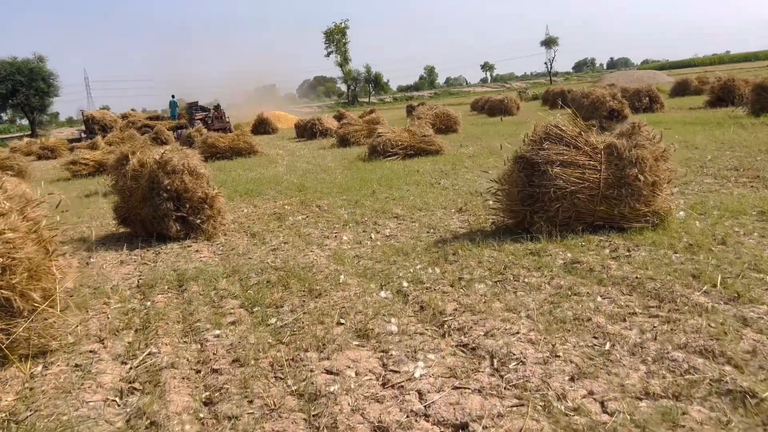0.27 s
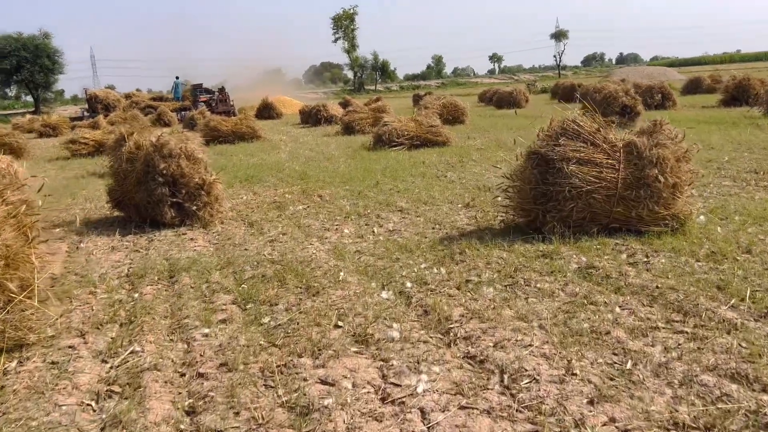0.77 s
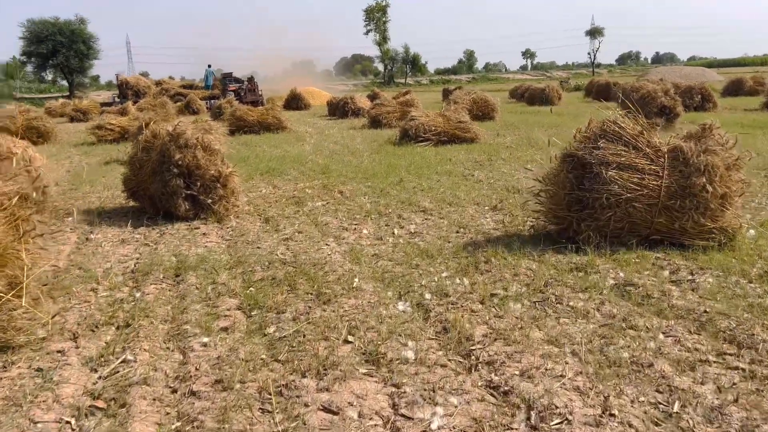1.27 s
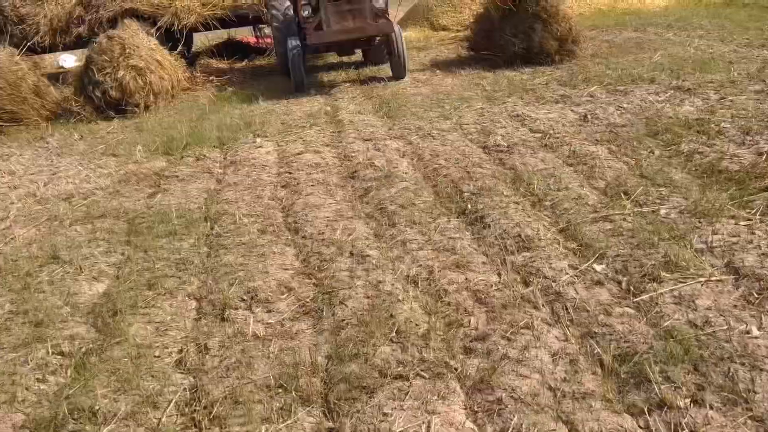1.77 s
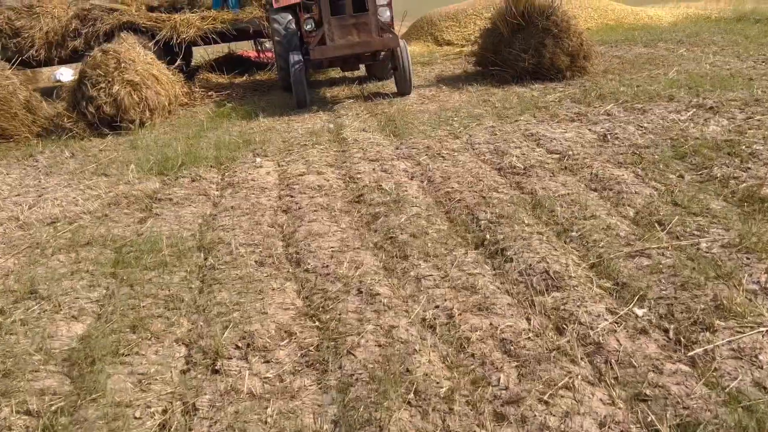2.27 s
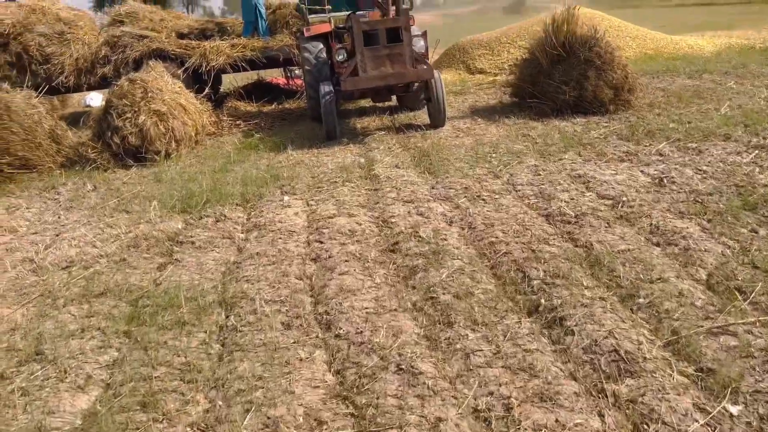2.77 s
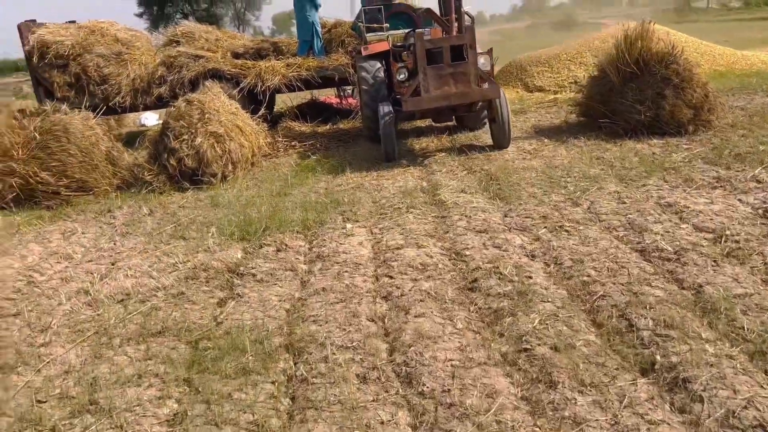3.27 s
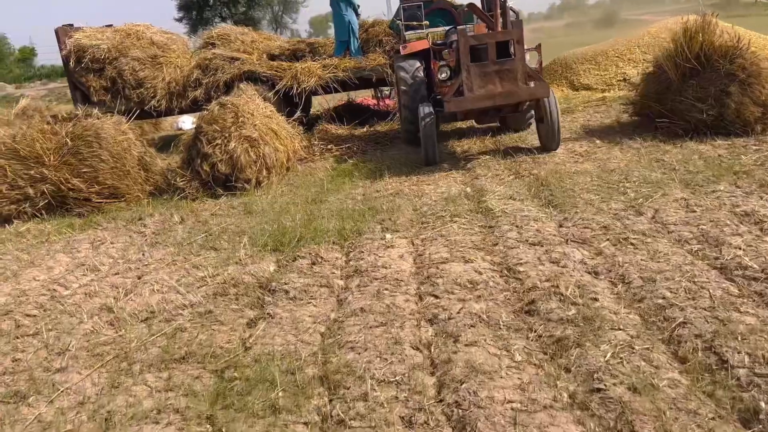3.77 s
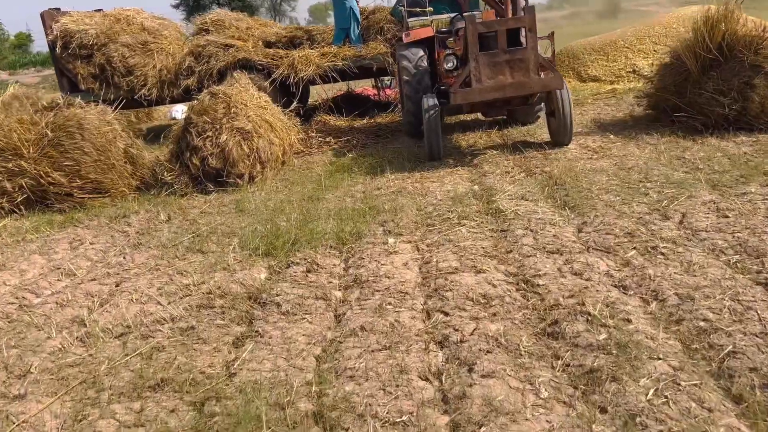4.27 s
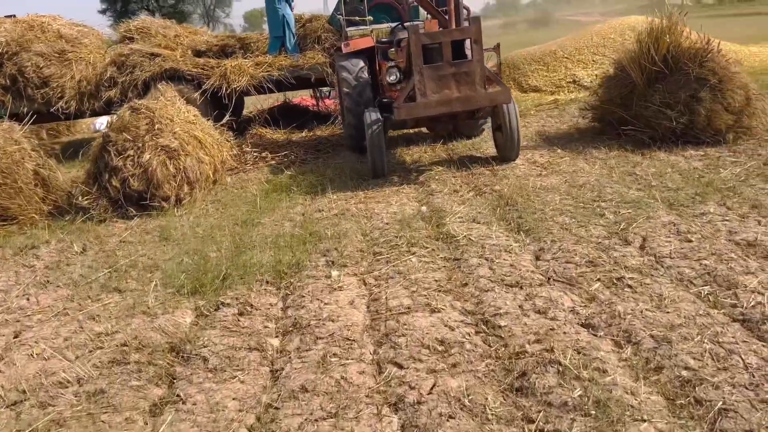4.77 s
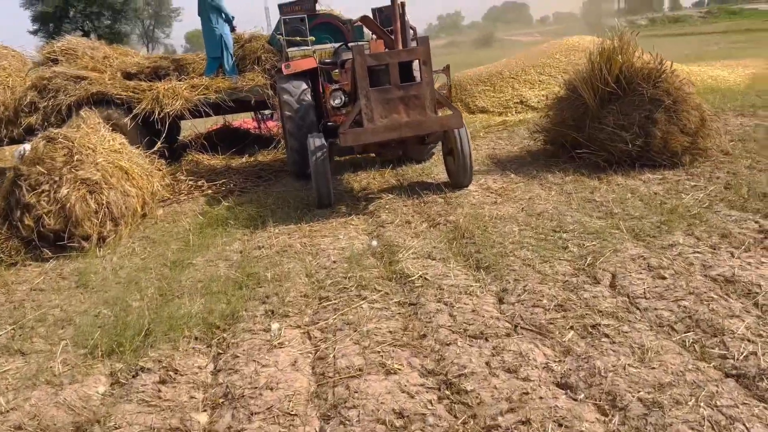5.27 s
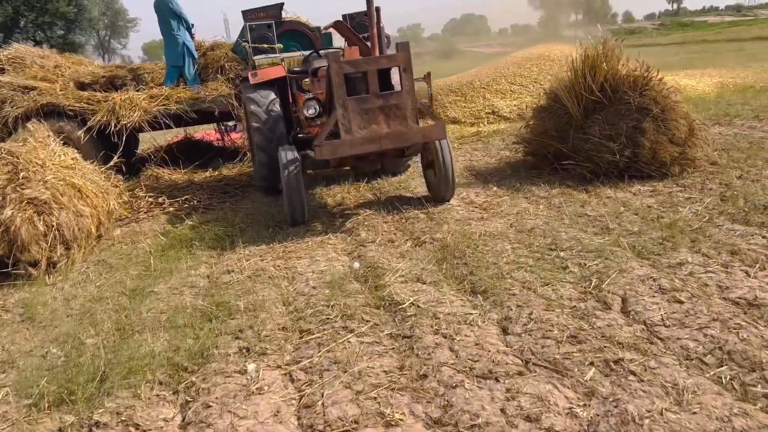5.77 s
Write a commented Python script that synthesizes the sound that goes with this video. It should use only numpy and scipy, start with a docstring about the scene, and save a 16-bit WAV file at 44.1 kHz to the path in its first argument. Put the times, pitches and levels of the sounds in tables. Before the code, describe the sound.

A diesel tractor drives a grain thresher in an open field, heard first from far off as a faint, steady low drone with light clatter and a thin hiss. In the first quarter second a footstep crackles on dry stubble and clods close to the microphone, followed by a few small straw snaps. At about 1.7 seconds the sound dips to silence for an instant, then returns much louder and closer: a strong low hum, pulsing exhaust, rapid metallic knocking and straw rasping through the drum. The engine speed stays steady while the sound grows gradually louder as the listener walks nearer. Brief snaps and knocks come underfoot between 2.1 and 3 seconds and near 3.7. From about 4.7 seconds the drum rasps and rattles harder in uneven surges. Sharp clod knocks stand out around 5 and 5.7 seconds, and the machine is still running at 6.

```python
"""Tractor and thresher in stubble

A three-cylinder diesel tractor drives a grain thresher in an open field. It is heard from far off,
then, after a short fade through silence, from a few metres away and drawing nearer. Engine and drum
beat in a low hum, firings pulse through the exhaust, knocks excite the block and panels, and straw
rushes through the drum. Dry stalks and clods fracture underfoot."""
import sys
import numpy as np
from scipy import signal
from scipy.fft import rfft, irfft, next_fast_len
from scipy.io import wavfile
from scipy.ndimage import map_coordinates

SR = 44100
rng = np.random.default_rng(int(sys.argv[2]) if len(sys.argv) > 2 else 0)


def bounce(signal):
    """Save signal as a 16-bit WAV file at the path given by the first command-line argument."""
    frames = np.transpose(np.atleast_2d(signal))
    limited = np.clip(frames, -1, 1)
    pcm = np.round(limited * 32767).astype(np.int16)
    wavfile.write(sys.argv[1], SR, pcm)


N = 265526
T = np.arange(N) / SR
CYLINDERS = 3
FAR_END_S, NEAR_START_S = 1.668, 1.695  # the silence between far and near


def amp(db):
    """Decibels to amplitude ratio."""
    return 10 ** (np.asarray(db) / 20)


def unit(x):
    """Normalisation to rms 1."""
    return x / np.sqrt(np.mean(x ** 2) + 1e-20)


def along(points, hz):
    """Interpolation of (frequency_hz, value) points on a logarithmic frequency axis."""
    f, v = np.transpose(points)
    return np.interp(np.log(hz + 1), np.log(f + 1), v)


def curves(rows):
    """Linear interpolation in time: one value per sample for each column after the first."""
    times, *columns = np.transpose(rows)
    return [np.interp(T, times, column) for column in columns]


def wobble(rate):
    """Random modulation: a smooth curve through `rate` Gaussian values a second."""
    return map_coordinates(rng.standard_normal(int(N * rate / SR) + 4), [T * rate])


def filtered(x, response):
    """Linear filtering: the spectrum of x times a complex frequency response."""
    size = next_fast_len(N + SR // 4)
    return irfft(rfft(x, size) * response(np.fft.rfftfreq(size, 1 / SR)), size)[..., :N]


def causal(gain):
    """The minimum-phase response with this gain, by folding the cepstrum."""
    cepstrum = irfft(np.log(np.maximum(gain, 1e-6)))
    half = len(cepstrum) // 2
    return np.exp(rfft(cepstrum * np.r_[1, np.full(half - 1, 2), 1, np.zeros(half - 1)]))


def coloured(x, spectrum):
    """Source and filter: x shaped by a spectral envelope, at rms 1."""
    return unit(filtered(x, lambda hz: causal(amp(along(spectrum, hz)))))


# Likeness of left and right: frequency_hz, correlation
COHERENCE = [(60, 1), (350, 1), (510, .4), (720, .88), (1050, .92), (1200, .2), (1400, .4), (2000, .55),
             (2500, .4), (3700, .5), (5500, .15), (9000, .25), (11500, .6), (15000, .6)]
def spread(pair):
    """Partial coherence: two independent signals mix to be alike in the bass, apart in the treble."""
    angle = lambda hz: np.arccos(np.clip(along(COHERENCE, hz), -1, 1)) / 2
    mid, side = filtered(pair, lambda hz: np.array([np.cos(angle(hz)), np.sin(angle(hz))]))
    return unit(np.array([mid + side, mid - side]))


def strokes(cycles, offset, pattern_db, scatter_db, jitter_s):
    """A quasi-periodic impulse train: one impulse a cycle, sized by a repeating pattern and chance."""
    k = np.arange(int(cycles[-1] - offset) + 1)
    chance = rng.standard_normal((len(k), 2))
    start_s = np.interp(k + offset, cycles, T) + jitter_s * chance[:, 0]
    size = amp(np.take(pattern_db, k, mode="wrap") + scatter_db * chance[:, 1])
    return np.bincount(np.clip(start_s * SR, 0, N - 1).astype(int), size, N)


def hum(firing, harmonics, slip_hz):
    """Beating: the belt-driven drum turns a little slower than the engine fires."""
    def tone(cycles):
        return unit(np.cos(2 * np.pi * cycles + 0.044 * wobble(4.6))) * amp(0.24 * wobble(5.6))
    return sum(amp(engine_db) * tone(order * firing)
               + amp(drum_db) * tone(order * (firing - slip_hz * (T - swell_s)))
               for order, engine_db, drum_db, swell_s in harmonics)


# Exhaust lines, as multiples of the four-stroke cycle rate: order
LINE_ORDERS = np.array([3, 5, 11, 17, 21, 23, 24, 26, 29, 32])
# Relative strength of each line: level_db
LINE_LEVELS = [-20, -11.5, -11, -9, -12.5, -9, -11, -14, -13.5, -16.5]
# Response of the exhaust pipe: frequency_hz, gain_db
PIPE_RESPONSE = [(15, -36), (28, -40), (38, -13), (55, -0.5), (90, -0.5), (135, 0.5), (215, 1.5),
                 (245, -1.5), (285, -1.5), (390, -4.5), (450, -15.5), (560, -23.5), (1000, -61)]
def exhaust(firing, lines_db, puff_db, rumble_db):
    """Pulsating flow: unequal cylinders leave spectral lines; firings puff over turbulent rumble."""
    def line(order):
        phase = 2 * np.pi * (order * firing / CYLINDERS + rng.random())
        return unit(np.cos(phase + 0.041 * order * wobble(9)))
    lines = sum(amp(db + 2.04 * wobble(4.055)) * line(k) for k, db in zip(LINE_ORDERS, LINE_LEVELS))
    puffs = coloured(strokes(firing, 0, [.7, -1, 0], scatter_db=1, jitter_s=.0004), PIPE_RESPONSE)
    throb = 1 + .18 * np.cos(2 * np.pi * firing)
    rumble = spread(coloured(throb * rng.standard_normal((2, N)), PIPE_RESPONSE))
    return amp(lines_db) * lines + amp(puff_db) * puffs + amp(rumble_db) * rumble


# Knocks within one four-stroke cycle: offset_firings, level_db
CYCLE_KNOCKS = [(.05, -10), (.42, -6), (.70, -1), (.82, -3), (1.08, -7), (1.45, -3), (1.70, -2), (2.08, -9),
                (2.28, -10), (2.46, -4.5), (2.69, -1), (2.84, -4)]
def knocking(firing, decay_s, wash):
    """Impact noise: combustion, injectors and valves give decaying bursts over the drum's even wash."""
    hits = sum(strokes(firing / CYLINDERS, offset / CYLINDERS, [db], scatter_db=1.5, jitter_s=.0003)
               for offset, db in CYCLE_KNOCKS)
    bursts = signal.lfilter([1], [1, -np.exp(-1 / (decay_s * SR))], hits)
    return unit((unit(bursts) + wash) * rng.standard_normal((2, N)))


def ringing(x, modes):
    """Modal resonance: metal rings at its natural frequencies, each swelling and sinking on its own."""
    mode = lambda hz, width: signal.lfilter(*signal.iirpeak(hz, hz / width, fs=SR), x)
    return spread(sum(amp(db + 1.7 * wobble(4)) * mode(hz, width) for hz, width, db in modes))


# Modes of the panels and castings: pitch_hz, bandwidth_hz, level_db
PANEL_MODES = [(508, 27, -2.5), (630.5, 28, 6), (729, 33, -0.5), (858, 27, 4.5), (936, 42, 4),
               (1012, 20, -1.5), (1284, 21, 8), (1418, 33, -0.5), (1568, 35, -5.5), (1680, 44, -1.5),
               (1798, 25, -4), (2000, 37, -5.5)]
def panels(firing, decay_s, wash):
    """Impact excitation: each knock sets the panels and castings ringing."""
    return ringing(knocking(firing, decay_s, wash), PANEL_MODES)


def straw(firing, spectrum, grain_db, throb):
    """Granular noise: chaff blown through the thresher hisses with countless small impacts."""
    grains = amp(grain_db * wobble(1000) + 0.53 * wobble(13))
    pulsing = 1 + throb * np.cos(2 * np.pi * (firing - .5))
    return spread(coloured(grains * pulsing * rng.standard_normal((2, N)), spectrum))


# Distant hum, on harmonics of the firing rate: order, engine_db, drum_db, swell_time_s
FAR_HARMONICS = [(2, 1, -3, 0.49), (3, -2, -12, 0.78), (4, -13, -13, 0.587), (5, -12.5, -17, 0.4)]
# Spectrum of the distant engine block: frequency_hz, gain_db
FAR_BLOCK = [(380, -23), (460, -3), (510, 0), (580, -7), (700, 0), (1000, -2.5), (1400, -2), (1850, -10.5),
             (2200, -3.5), (2900, -10.5), (3500, -14), (4500, -31), (6500, -50)]
# Spectrum of the distant chaff: frequency_hz, gain_db
FAR_CHAFF = [(2500, -24), (4200, 4), (6000, 0.5), (7000, -2), (8500, 0.5), (10000, -11.5), (12000, -9),
             (15000, -9)]
def far_machine(firing):
    """Comb filtering: across the field a second, slightly longer path hollows the block's clatter."""
    direct = spread(coloured(knocking(firing, decay_s=0.0038, wash=2.9), FAR_BLOCK))
    comb = lambda hz: 1 - .42 * np.exp(-2j * np.pi * hz * .00154)
    clatter = unit(filtered(direct, comb)) + amp(-6.5) * panels(firing, decay_s=0.0024, wash=0.99)
    drone = hum(firing, FAR_HARMONICS, slip_hz=0.745)
    pipe = exhaust(firing, lines_db=-3, puff_db=-12.5, rumble_db=-1)
    hiss = straw(firing, FAR_CHAFF, grain_db=1.5, throb=.05)
    return amp(-36) * (drone + pipe) + amp(-44) * clatter + amp(-54) * hiss


# Stubble crushed underfoot: centre_s, length_s, level_db
TREADS = [(0.02, 0.11, -53), (0.132, 0.14, -51), (0.335, 0.13, -63), (.75, 0.33, -61), (1.02, 0.067, -53),
          (1.41, 0.15, -54), (2.146, 0.078, -37.5), (4.74, 0.08, -34.5), (5.053, 0.043, -38)]
# Single dry straws snapping: start_s, level_db, stem_offset_db
STRAW_SNAPS = [(0.1256, -24.5, -24), (0.1374, -29, -3.5), (0.1473, -39, -9), (0.174, -34, -3),
               (0.418, -47, 8), (0.4888, -37, -18), (0.698, -47, -8), (0.927, -29, -4), (1.01, -38, -11),
               (1.479, -42.5, 7.5), (2.283, -29, 0), (2.44, -27, -10), (2.943, -31, 2), (3.6616, -18, -7),
               (4.9577, -21, -12), (5.0599, -27, -3)]
# Spectrum of a thin stalk breaking: frequency_hz, gain_db
THIN_STALK = [(1500, -30), (4000, 0.5), (9000, -4), (11500, -0.5), (15500, -2)]
# Spectrum of a thick stem breaking: frequency_hz, gain_db
THICK_STEM = [(1000, -14), (3500, 2), (4700, 1), (8000, -8), (15000, -15)]
def stubble():
    """Brittle fracture: straws snap, thick ones with a lower crack; a tread crushes many at once."""
    burst = lambda start_s, t60_s: amp(-60 * np.clip(T - start_s, 0, 1) / t60_s) * (T >= start_s)
    noise = lambda spectrum: spread(coloured(rng.standard_normal((2, N)), spectrum))
    snaps = sum(amp(db - 4) * burst(s, t60_s=0.015) for s, db, _ in STRAW_SNAPS)
    cracks = sum(amp(db + stem_db - 5.5) * burst(s, t60_s=0.047) for s, db, stem_db in STRAW_SNAPS)
    treads = sum(amp(db) * np.exp(-2 * ((T - s) / length) ** 2) for s, length, db in TREADS)
    rustle = amp(-71 + 2.1 * wobble(7.8))  # stubble stirring between the treads
    crunch = (treads + rustle) * unit(amp(5 * wobble(900)))
    return (snaps + crunch) * noise(THIN_STALK) + cracks * noise(THICK_STEM)


# Clods knocking underfoot: start_s, level_db, pitch_hz, t60_s, grit_offset_db
CLOD_KNOCKS = [(.112, -24, 1500, .004, -10), (.1135, -23.5, 470, .014, -20), (.1225, -25, 800, .008, -8),
               (.1235, -28, 2200, .006, -9), (.138, -27, 1600, .007, -7), (.1473, -19, 1900, .005, -9),
               (.1488, -21, 540, .011, -14), (.159, -16.5, 1350, .005, -7), (.1751, -10, 860, .006, -15),
               (.1772, -20, 580, .015, -18), (.255, -35, 2000, .006, -5), (1.585, -37, 1120, .008, -7),
               (2.2795, -13, 1300, .005, -13), (2.335, -18, 1200, .005, -12), (2.911, -16, 1280, .0045, -8),
               (4.9906, -.5, 1520, .0052, -18), (4.991, -9, 2800, .004, -14), (5.0622, -6, 850, .012, -20),
               (5.663, -4.5, 1300, .0055, -13), (5.6645, -10, 700, .007, -18),
               (5.7038, -5.5, 805, .008, -16)]
# Response of the soil: frequency_hz, gain_db
SOIL_RESPONSE = [(150, -21), (400, 7.5), (750, 2), (1300, 2), (2300, 2), (3400, -11), (5000, -12),
                 (12000, -18)]
def clods():
    """Damped vibration: each clod rings for a few cycles and sheds a puff of crumbling grit."""
    out, t = np.zeros((2, N + SR)), np.arange(SR // 20) / SR
    lowpass = signal.butter(2, 2950, fs=SR)
    crumble = amp(-60 * t / .006) + .3 * amp(-60 * t / .07)
    for start_s, db, hz, t60_s, grit_db in CLOD_KNOCKS:
        ring = np.sin(2 * np.pi * hz * t) * amp(-60 * t / t60_s)
        grit = crumble * (rng.standard_normal(len(t)) + rng.standard_normal((2, len(t))))
        grit = unit(signal.lfilter(*lowpass, grit)) * np.sqrt(np.mean(crumble ** 2))
        start = round(start_s * SR)
        out[:, start:start + len(t)] += amp(db) * (ring + amp(grit_db) * grit)
    return filtered(out[:, :N], lambda hz: causal(amp(along(SOIL_RESPONSE, hz))))


# Strength of the drum's two sounds: time_s, rasp_db, rattle_db
DRUM_LEVELS = [(1.9, -39, -46), (2.3, -38, -44), (3.2, -38.5, -52), (4.2, -41.5, -49), (4.7, -37, -39),
               (5.14, -35.5, -38), (5.25, -36, -35), (5.38, -34, -38), (5.5, -36.5, -33.5),
               (5.78, -34.5, -43), (5.9, -36.5, -30.5), (6, -34, -37)]
# Spectrum of the drum rasping on straw: frequency_hz, gain_db
RASP_SPECTRUM = [(1500, -45), (2200, 5.5), (2600, 2.5), (2850, -0.5), (3050, 2), (3330, -.5), (3580, -0.5),
                 (4000, -6), (4300, -9.5), (5500, -17), (8000, -48)]
# Modes of the drum casing: pitch_hz, bandwidth_hz, level_db
CASING_MODES = [(2610, 67, 6.5), (2823, 45, -7.5), (3057, 25, 3.5), (3548, 31, 1.5), (4290, 98, -6)]
def drum(firing):
    """Friction and resonance: the drum rasps on straw and rattles its casing as the feed surges."""
    rasp_db, rattle_db = curves(DRUM_LEVELS)
    rasp = amp(rasp_db) * spread(coloured(knocking(firing, decay_s=0.014, wash=2.8), RASP_SPECTRUM))
    rattle = amp(rattle_db) * ringing(knocking(firing, decay_s=0.009, wash=0.96), CASING_MODES)
    surge = amp(wobble(10))
    return surge * (rasp + rattle)


def approach(start_db, halving_db):
    """Distance law: on a steady walk towards the tractor, each halving of range adds halving_db."""
    start_m, walk_m_per_s = 9.03, 0.82
    range_m = start_m - walk_m_per_s * np.maximum(T - NEAR_START_S, 0)
    return amp(start_db + halving_db * np.log2(start_m / range_m))


# Short echo on each side: time_s, left_delay_s, left_gain, right_delay_s
REFLECTION = [(1.7, .00162, -.17, .00105), (2.4, .00182, -.08, .00111), (2.7, .00176, -.38, .00114),
              (3.6, .00164, -.38, .00109), (4.2, .00154, -.22, .00104), (4.7, .0015, -.16, .00101),
              (5.3, .00147, -.04, .00099), (6.02, .00145, -.06, .00099)]
def echoed(pair):
    """Interference: a nearby surface adds one short echo, which sweeps as the listener moves forward."""
    left_delay, left_gain, right_delay = curves(REFLECTION)
    late = lambda x, delay_s: map_coordinates(x, [(T - delay_s) * SR])
    left, right = pair
    return np.array([left + left_gain * late(left, left_delay), right + 0.14 * late(right, right_delay)])


# Close hum, on harmonics of the firing rate: order, engine_db, drum_db, swell_time_s
NEAR_HARMONICS = [(2, 4.5, -3.5, 3.912), (3, -0.5, -9.5, 4.19), (4, -10, -11.5, 4.05),
                  (5, -12.5, -11.5, 4.95), (6, -17.5, -16, 3.1)]
# Spectrum of the close engine block: frequency_hz, gain_db
NEAR_BLOCK = [(250, -28), (430, 0), (520, -2.5), (620, 0.5), (720, 0.5), (900, -0.5), (1030, -3),
              (1130, -2.5), (1380, -2), (1520, -4.5), (1720, -1.5), (1900, -14.5), (2100, -8), (2500, -25),
              (4000, -43)]
# Spectrum of the close chaff: frequency_hz, gain_db
NEAR_CHAFF = [(2500, -21), (4200, 1), (6000, 0), (7000, -4.5), (8500, -1), (10000, -6.5), (12000, -10),
              (15000, -5.5)]
def near_machine(firing):
    """Superposition at close range: the knocks stand out, the drum joins in and the machine grows."""
    block = spread(coloured(knocking(firing, decay_s=.0026, wash=1.6), NEAR_BLOCK))
    ring = amp(-1) * panels(firing, decay_s=.002, wash=.7)
    clatter = approach(-27, 7.75) * unit(block + ring)
    threshing = drum(firing)
    drone = approach(-23, 4.4) * hum(firing, NEAR_HARMONICS, slip_hz=.793)
    pipe = approach(-21.5, 2.1) * exhaust(firing, lines_db=-3.5, puff_db=-15, rumble_db=-3)
    hiss = approach(-40, 5.3) * straw(firing, NEAR_CHAFF, grain_db=0, throb=0.089)
    return drone + pipe + echoed(clatter + threshing) + hiss


# Level of left over right: frequency_hz, difference_db
LEVEL_DIFFERENCE = [(60, -2.5), (92, -1.5), (140, -4), (210, -2), (330, -4.5), (500, 3), (770, 0.5),
                    (1170, 0.5), (1790, -1.5), (2740, -3), (4190, 0.5), (6410, 1.5), (9810, -5.5),
                    (15000, 2.5)]
# Phase by which left leads right: frequency_hz, lead_rad
PHASE_DIFFERENCE = [(60, 0), (400, 0.07), (510, 2.4), (660, -0.5), (1030, 1.15), (1200, 2.4), (1330, 0.44),
                    (1750, 1.6), (1980, -1.16), (2400, -2.5), (3100, 0.16), (3700, 0.76), (5000, 2.5),
                    (6500, 0), (9000, -2.3), (11500, 0), (15000, 3)]
def ports(hz):
    """Interchannel difference: the two microphone ports differ in colour and phase."""
    sides = np.array([[1], [-1]]) / 2
    return amp(sides * along(LEVEL_DIFFERENCE, hz)) * np.exp(1j * sides * along(PHASE_DIFFERENCE, hz))


def fade(seconds, length_s):
    """A square-law fade, silent at 0 s and fully open at length_s."""
    return np.clip(seconds / length_s, 0, 1) ** 2


# Engine speed: time_s, firing_rate_hz
FIRING_RATE = [(0, 37.2), (.4, 37.25), (1, 37.5), (1.6, 37.6), (1.75, 36.4), (3.2, 36.35), (4, 36.5),
               (4.8, 36.6), (5.4, 36.8), (6.02, 36.9)]
def scene():
    """One engine phase drives the far machine, then the near one, with the ground cracking underfoot."""
    firing = np.cumsum(curves(FIRING_RATE)[0]) / SR  # phase, counted in firings
    far = fade(FAR_END_S - T, length_s=0.062)
    near = fade(T - NEAR_START_S, length_s=0.13)
    machine = far * far_machine(firing) + near * near_machine(firing)
    return filtered(machine, ports) + (far + near) * (clods() + stubble())


def record(dry):
    """Soft saturation rounds the highest peaks, and a band limit removes the extreme treble."""
    rounded = dry / (1 + np.abs(dry / .97) ** 10) ** (1 / 10)
    return filtered(rounded, lambda hz: hz < 15900)


dry = scene()
out = record(dry)
bounce(out)
```